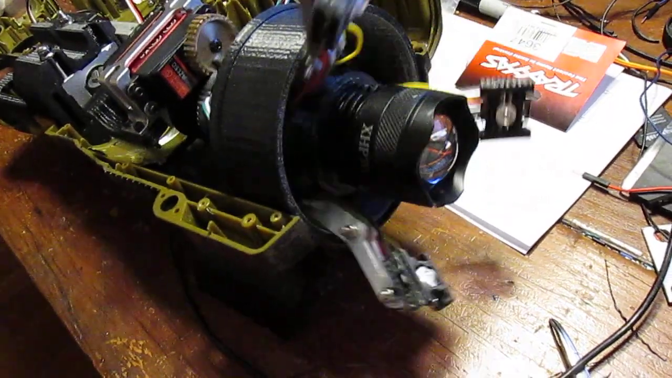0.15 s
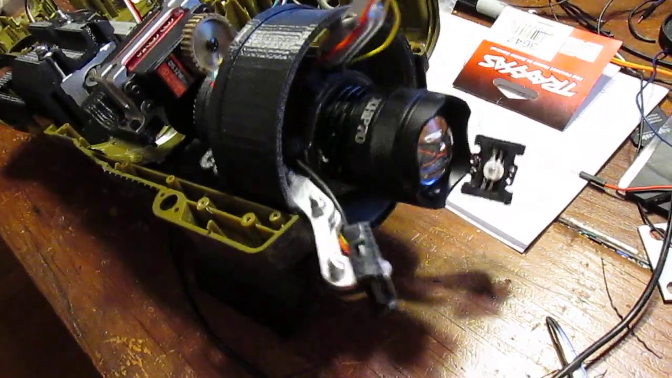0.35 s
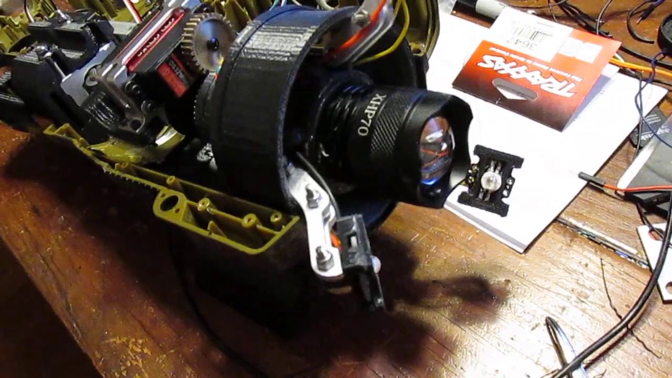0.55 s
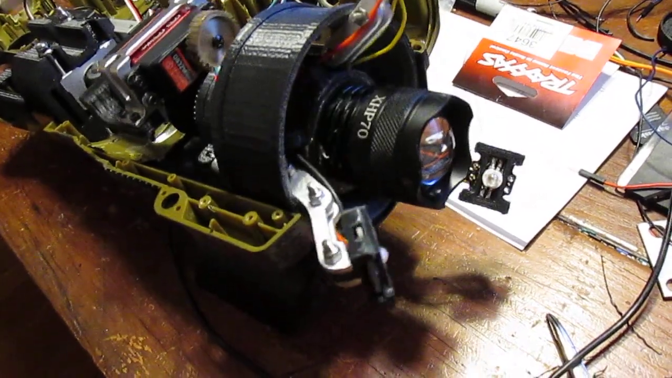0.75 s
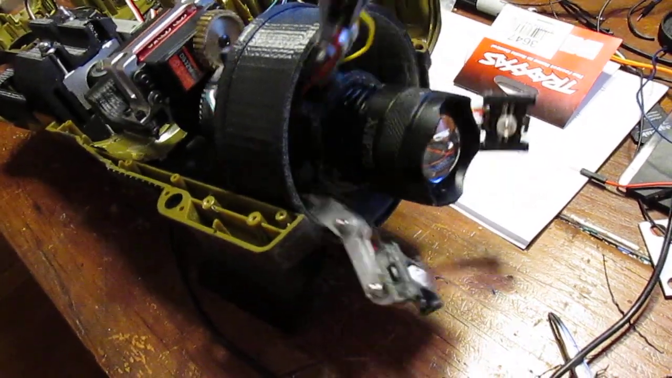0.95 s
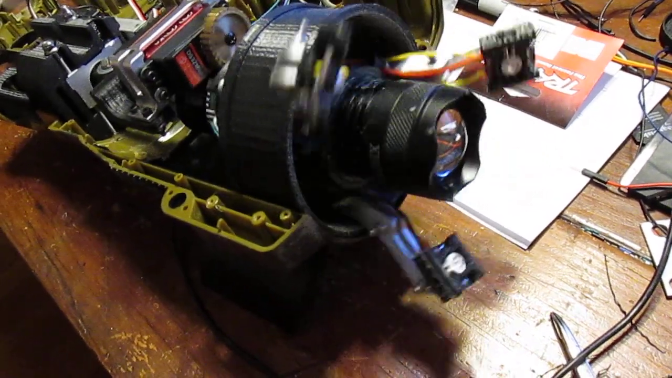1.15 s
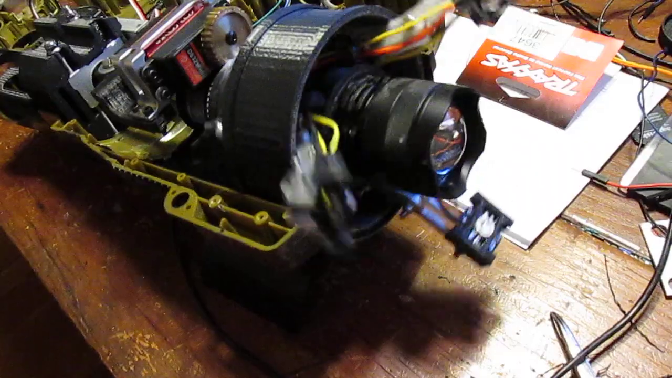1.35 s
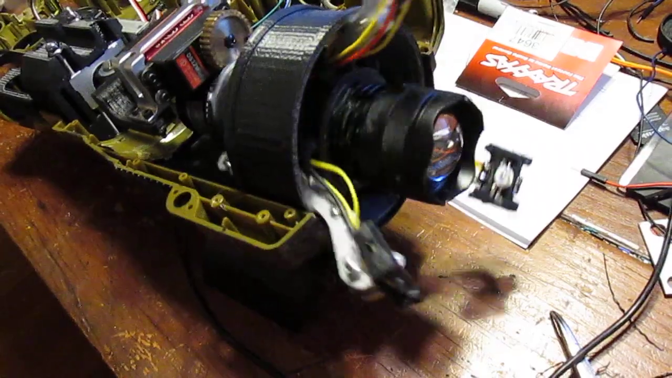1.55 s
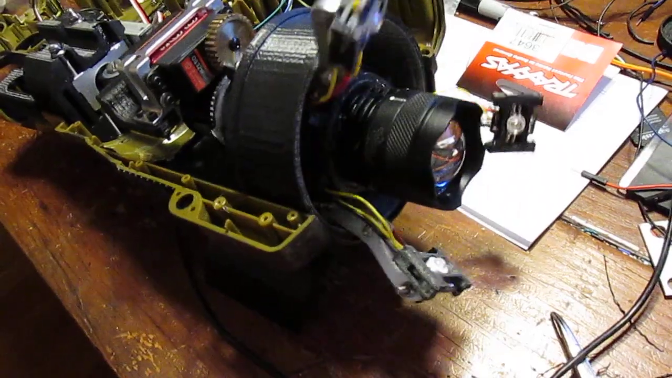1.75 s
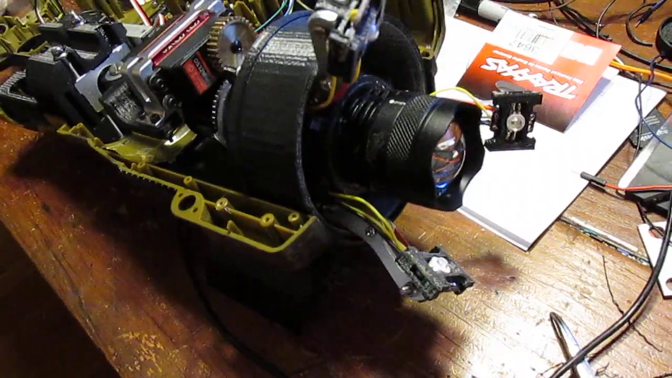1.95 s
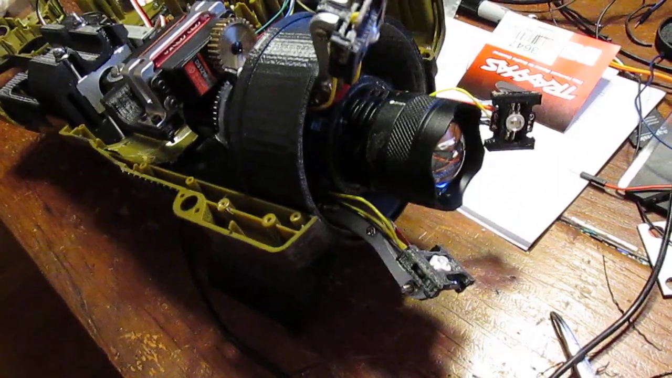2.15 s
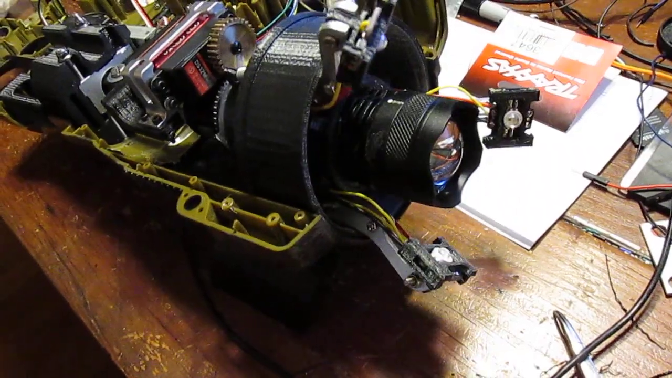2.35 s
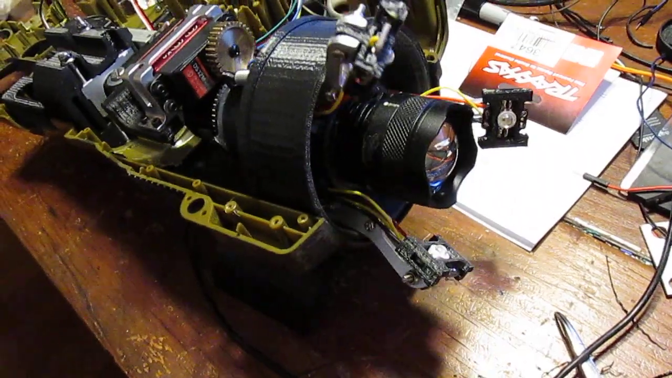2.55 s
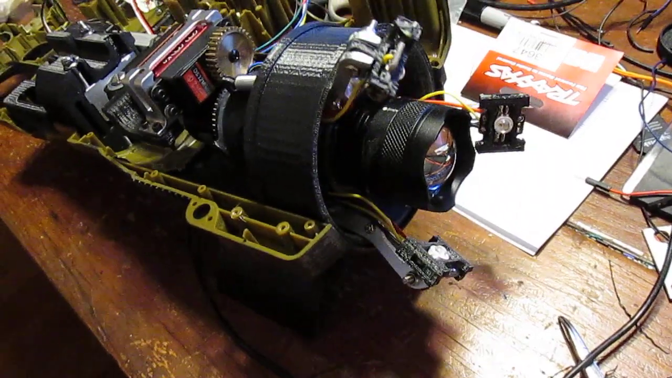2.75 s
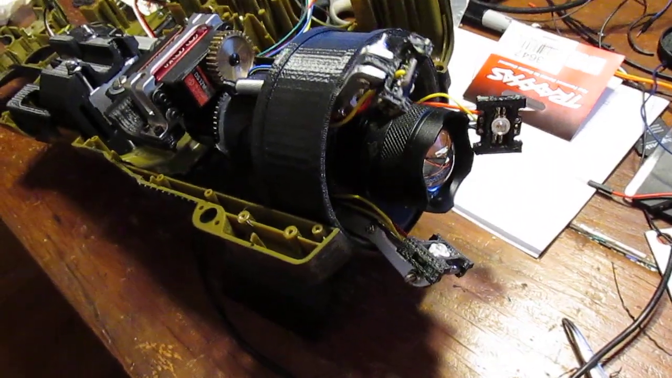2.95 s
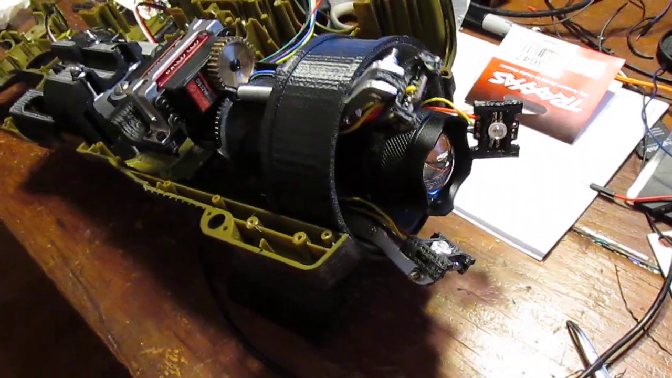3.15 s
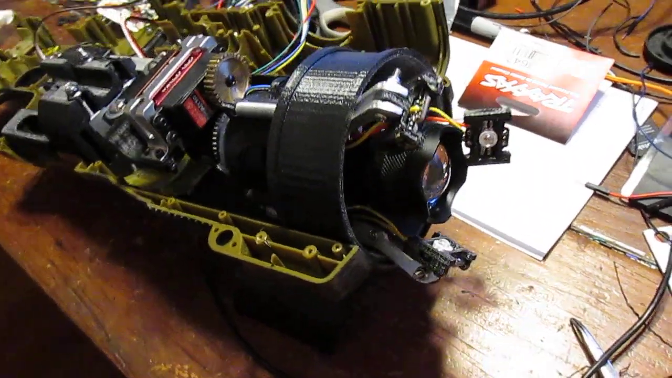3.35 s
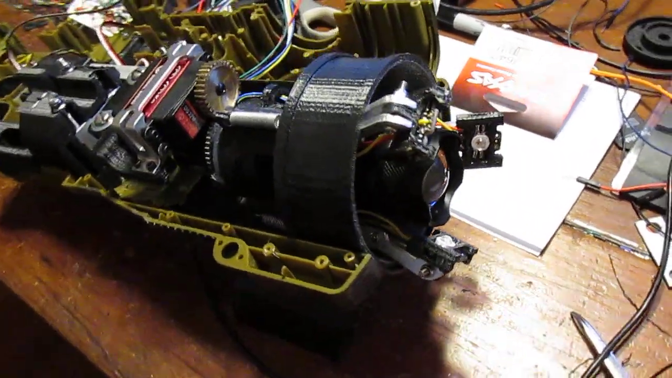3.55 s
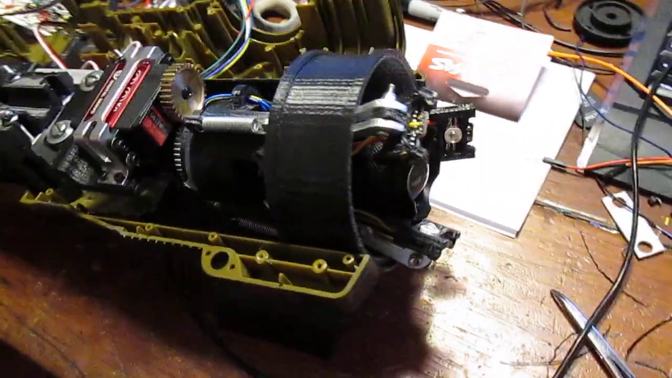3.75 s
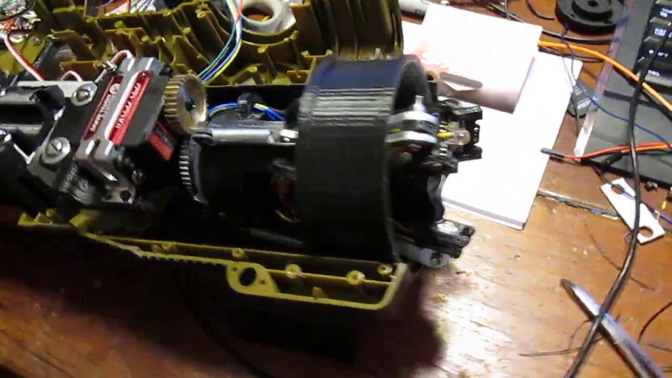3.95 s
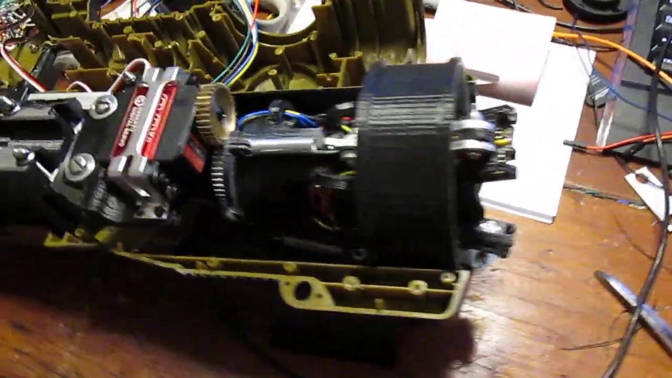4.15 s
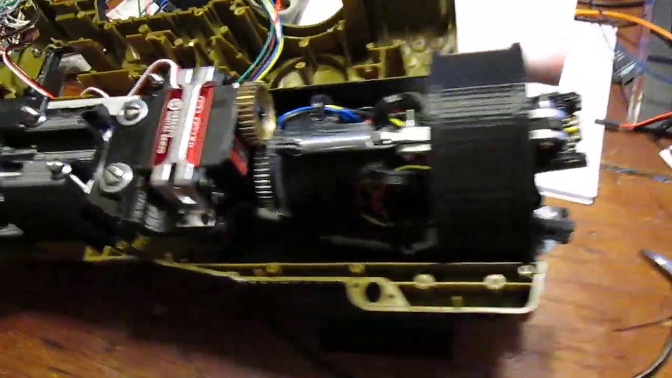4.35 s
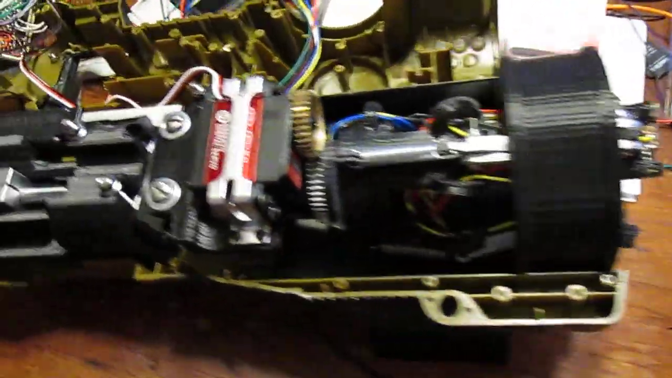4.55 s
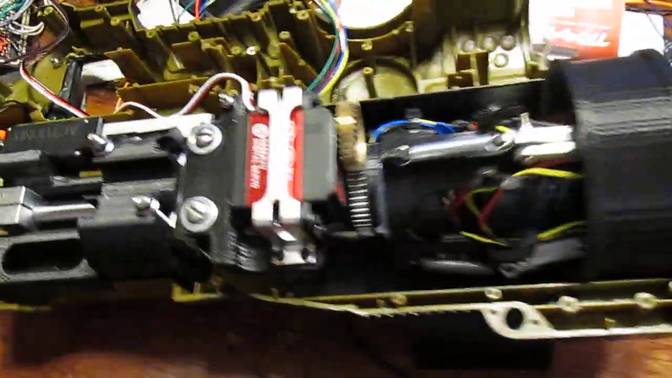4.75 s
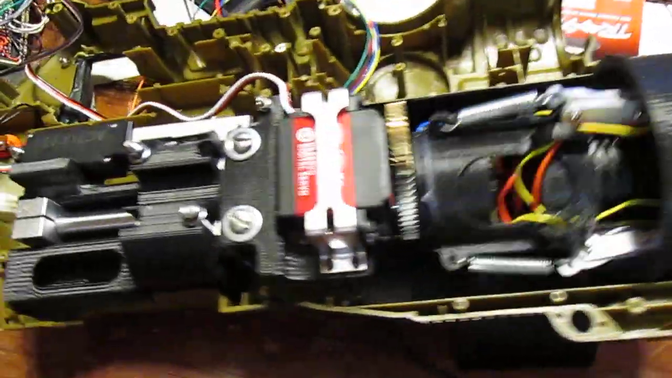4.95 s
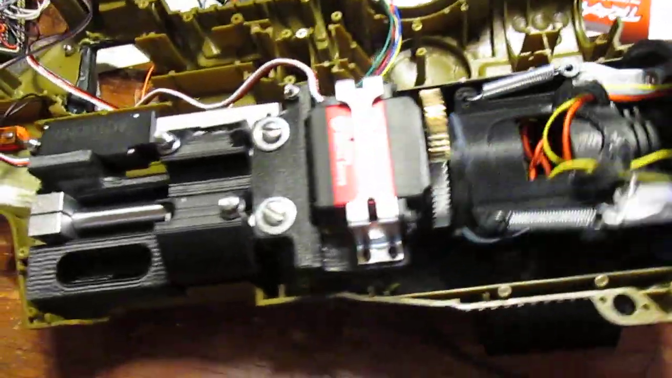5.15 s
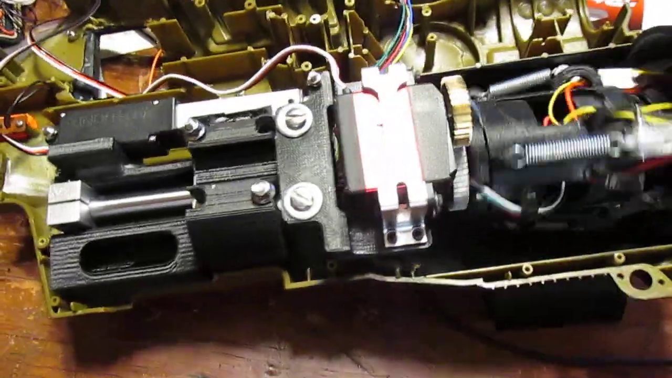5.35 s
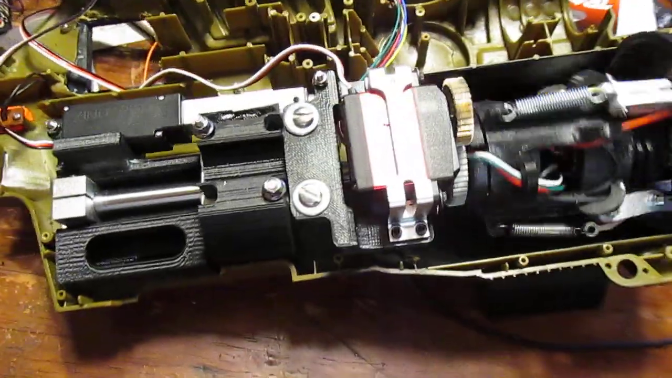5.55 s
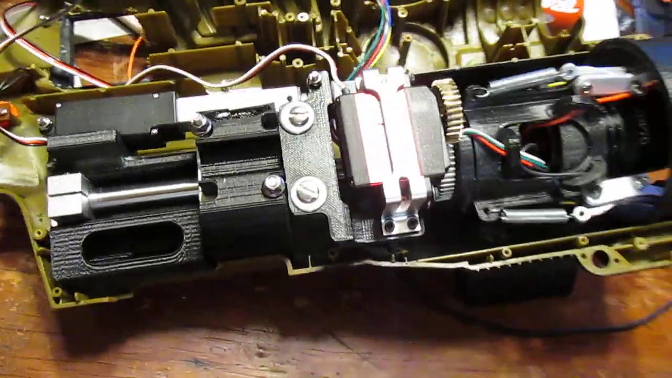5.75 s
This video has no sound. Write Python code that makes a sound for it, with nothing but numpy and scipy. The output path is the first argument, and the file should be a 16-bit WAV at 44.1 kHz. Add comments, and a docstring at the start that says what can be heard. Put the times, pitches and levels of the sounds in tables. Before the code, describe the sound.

Close on a workbench in a small room, a geared servo whirrs already at the start, stops, then swings again with rattling teeth. After a brief quiet, a small actuator motor spins up and hums steadily with gear grind and hiss. A third, brighter servo burst covers it while it slows and fades. Soft plastic knocks and hand rumble on the handheld stereo microphone.

```python
"""On a workbench in a small room, a geared servo swings the arms of a small mechanism three times, close to a
hand-held camera. Its gear teeth whine and rattle; the first swing is already under way at the start.
After the second swing a linear actuator spins up and hums: multiples of its shaft rate, gear grind, brush hiss.
It sags when the servo starts on the same supply, then coasts to a halt. Linkages knock softly, gear teeth snap,
the hand bumps and rumbles on the camera, and a fading noise tail makes the room ring."""
import sys
import numpy as np
from scipy import signal
from scipy.fft import rfft, irfft, next_fast_len
from scipy.io import wavfile

SR = 44100
rng = np.random.default_rng(int(sys.argv[2]) if len(sys.argv) > 2 else 0)


def wav_out(sig):
    """Save sig, one row per channel (or a flat mono array), as 16-bit PCM at SR to the path in sys.argv[1]."""
    wavfile.write(sys.argv[1], SR, np.round(np.clip(np.atleast_2d(sig).T, -1, 1) * 32767).astype(np.int16))


N = 259308
T = np.arange(N) / SR  # time of every sample in seconds

# Servo swings. Each row: start in seconds, start of braking in seconds, rise in seconds, time it stays
# loud into the braking in seconds, base level in dB, level drift in dB per second, whine shift in dB,
# frame level against the case in dB.
SWINGS = [(-0.4, 0.334, .05, 0.067, -24, 2.5, -4, -22), (0.685, 1.711, 0.082, 0.05, -21, -3.5, -4.5, -24),
          (4.655, 5.641, 0.017, 0.054, -18, 0.5, -7.5, -24)]
# Cruising speed of the servo under the changing load of the arms, one table a swing.
# Each row: time in seconds, gear mesh rate in Hz before spin-up, braking and hunting.
CRUISE_1 = [(0.0, 1864), (0.084, 1819), (0.258, 1830), (0.33, 1862)]
CRUISE_2 = [(0.88, 1866), (1.07, 1842), (1.534, 1882), (1.56, 1897)]
CRUISE_3 = [(4.85, 1884), (5.312, 1963), (5.62, 1937)]
# How much the servo gears chatter. Each row: time in seconds, roughness from 0 to about 1.
CHATTER = [(0, 0.07), (.33, 0.18), (.42, 1.03), (.72, 0.57), (.9, 0.13), (1.3, 0.38), (1.5, 0.8),
           (1.8, 0.97), (4.7, 0.78), (5.25, 1), (5.6, 0.73)]
# Whine of each harmonic of the mesh rate, lowest first: dB against the rattle, before the swing's shift.
WHINE_DB = [-12.5, -5.5, -6, -8, -7.5, -14.5, -16]
# Ring of the servo case in each swing. Each row: frequency in Hz, relative level in dB.
CASE_1 = [(1650, -80.5), (2800, -32), (3450, -17), (3580, -14), (3790, -16.5), (4010, -16), (5050, -18.5),
          (5390, -8.5), (6130, -5), (7500, -5), (7830, -5.5), (9100, -1), (10200, -4.5), (13300, -12),
          (15600, -20)]
CASE_2 = [(1650, -42), (2800, -26.5), (3680, -16), (4370, -11), (4630, -23.5), (5090, -13), (5540, -6),
          (6170, -3.5), (7440, -7.5), (8000, -11.5), (8530, -6), (9370, -0.5), (10300, -4.5), (13200, -8.5),
          (15600, -26.5)]
CASE_3 = [(1650, -92.5), (2800, -31.5), (3400, -25), (3790, -17.5), (4010, -26), (4220, -18.5),
          (5830, -9.5), (6590, -17.5), (8850, -5.5), (9640, -2), (10500, -9.5), (11400, -3), (12200, -9.5),
          (13500, -6.5), (15600, -23)]
# Plastic frame shaken by the servo. Each row: frequency in Hz, relative level in dB.
FRAME = [(76, -23.5), (130, -0.5), (211, -24), (247, -1.5), (392, -18.5), (435, -10), (671, -3), (970, 6),
         (1540, 1), (1890, 4), (2190, 0.5), (3000, -11.5), (3900, -16.5), (6600, -120)]
# How a source reaches the two microphone ports, in three parts: rows of frequency in Hz and left-right
# difference in dB; the lead of the left port in seconds; rows of frequency in Hz and likeness from 0 to 1.
SERVO_ASIDE = ([(60, -1.5), (99, 0.5), (160, 5), (270, -6), (450, -1), (740, 0), (1220, 2), (2010, 3.0),
               (3330, 0.5), (5500, 10.5), (9080, 6.5), (15000, 1.5)], .000033, [(150, 1), (900, 1),
               (2200, 0.75), (5500, 1), (9200, 0.93), (15000, 0.48)])
SERVO_AHEAD = ([(60, -1), (99, 11.5), (160, -1), (270, 4), (450, 7), (740, 3), (1220, 7), (2010, 4.5),
               (3330, -3), (5500, 4.5), (9080, 6.5), (15000, 0.5)], -0.000012, [(150, 1), (900, 1),
               (3300, 0.88), (5000, 1), (6800, 0.28), (9500, 1), (15000, 0.5)])
ACTUATOR_AT = ([(60, -3.5), (160, -4), (450, 4), (740, 0.5), (1220, 2), (2010, 0), (3330, -4.5), (5500, 7),
               (9080, 10.5), (15000, -2.5)], .00008, [(150, 0.36), (600, 0.65), (1200, 1), (2600, 1),
               (4000, 0.22), (15000, 0.073)])
# The camera passes over the servo. Each row: time in seconds, added left-right difference in dB.
PASSING = [(4.68, 3.5), (4.736, -1), (5.432, -5.5), (5.72, -5.5)]

# Actuator speed on a full supply, under its changing load. Each row: time in seconds, shaft rate in Hz.
SHAFT_CRUISE = [(2.5, 191.7), (3.19, 192.4), (3.33, 194), (3.59, 189.6), (3.66, 193.1), (3.87, 190),
                (4.01, 192.7), (4.53, 191.4), (4.63, 194.4)]
# Way of the camera along the actuator. Each row: time in seconds, place (0 beside it, 1 above it,
# 2 over its gearbox).
CAMERA = [(3.32, 0.045), (3.43, 0.68), (3.84, 1), (4.0, 1.57), (4.3, 1.92), (4.65, 2.09), (4.85, 1.5)]
# How near the actuator is. Each row: time in seconds, gain in dB.
NEARNESS = [(2.45, -4.5), (3.25, -0.5), (3.8, 1.5), (4.2, 3), (4.6, 6), (4.85, -4.5), (5.15, -1)]
# Strongest shaft orders, as multiples of the shaft rate.
STRONG_ORDERS = (3, 5, 6, 7, 8, 10, 14)
# One row for each strong order: level from beside in dB, from above in dB, over the gearbox in dB,
# swell in dB either way, place of the swell in a screw turn from 0 to 1.
STRONG = [(-55.5, -53.5, -54, .5, 0), (-50.5, -40, -43, 1, 0.48), (-45, -48, -41, 3.5, 0),
          (-38, -46.5, -29, 1.5, 0.78), (-49, -40, -46, 3, 0.19), (-42.5, -48.5, -44, 3.5, 0.02),
          (-40, -46, -37, -1, 0.92)]
# Weaker shaft and gear orders, as multiples of the shaft rate.
WEAK_ORDERS = (4, 9, 11, 11.45, 12, 13, 15, 15.27, 16, 17, 19)
# Level of each weaker order: dB against the buzz, before the housing.
WEAK_DB = [-8, -8, -9, -17, -14.5, -6, -11, -6.5, -15, -5, -2]
# Actuator housing. Each row: frequency in Hz, relative level in dB.
HOUSING = [(350, -26), (620, -16.5), (850, 1), (1050, 1.5), (1300, 4), (1600, -7.5), (2100, -2),
           (2800, -1.5), (3400, -10), (4300, -19), (5500, -30)]
# Colour of the brushes from beside and from above. Each row: frequency in Hz, relative level in dB.
HISS_BESIDE = [(1880, -21.5), (3200, 2.5), (3790, -3), (4250, -15), (4900, -7), (5580, -1.5), (6110, -3),
               (6770, -0.5), (8380, -5), (8660, -9.5), (11000, -5), (11900, -8), (14000, -6), (15000, -39)]
HISS_ABOVE = [(1880, -54.5), (3200, -7.5), (4230, -1), (5130, -2.5), (5230, -2), (5690, -3.5), (7660, -10),
              (8330, -5), (9540, -11), (10900, -1), (11500, -5.5), (13900, -9.5), (15000, -57)]
# Higher shaft orders that whistle, as multiples of the shaft rate.
MESH_ORDERS = (27, 28, 29, 30, 31, 35, 36, 42, 56, 70)
# Whistle of each of these orders from beside and from above: dB within the brush sound, at full speed.
BESIDE_DB = [-22, -12.5, -5.5, -8.5, -24, -6, -9.5, -8, -10, -34]
ABOVE_DB = [-18.5, -12.5, -35, -23, -30, -16, -14.5, -9.5, -1.5, -11.5]

# Linkage knocks. Each row: time in seconds, peak level in dB.
KNOCKS = [(0.404, -40.5), (0.469, -42), (0.535, -46.5), (0.933, -37.5), (1.084, -27), (1.096, -35),
          (1.395, -32.5), (1.784, -46.5), (2.068, -55), (2.104, -45.5), (4.97, -33), (5.463, -32.5),
          (5.685, -35)]
# Ways the plastic frame rings under a knock. Each row: middle frequency in Hz, relative level in dB,
# time to fall by 60 dB in seconds.
FRAME_MODES = [(234, -35, 0.071), (928, 0, 0.17), (992, 5.5, 0.07), (1420, -2.5, 0.16), (1830, -4, 0.026),
               (2440, -3.5, 0.11), (3060, -21.5, 0.035)]
# Gear teeth snapping through their slack. Each row: time in seconds, peak level in dB.
SNAPS = [(0.2894, -18), (0.6905, -31.5), (0.6986, -16.5), (0.7352, -17), (4.6596, -11), (4.7793, -6)]
# Soft bumps of the hand on the camera. Each row: time in seconds, peak level in dB.
BUMPS = [(3.449, -40), (3.529, -41), (3.619, -38), (4.479, -39), (4.511, -37), (4.598, -44)]
# Rumble of the hand-held camera. Each row: time in seconds, level in dB before the trims in background().
HANDLING = [(0, -55.5), (.6, -69.5), (1.05, -58), (1.5, -66.5), (1.85, -71.5), (2.1, -77), (2.9, -72),
            (3.55, -57.5), (4.1, -58), (4.5, -55), (4.95, -68), (5.3, -57), (5.88, -71.5)]
# Colours of the deep sway, the rubbing bass and the room air. Each row: frequency in Hz, relative level in dB.
SUB = [(12, 18), (30, 0.5), (60, -20), (100, -20), (200, -36.5)]
BASS = [(40, 3), (75, 3), (170, 1), (260, -6.5), (400, -13.5), (900, -20), (3000, -51.5), (8000, -93)]
AIR = [(150, -27.5), (250, -18), (466, -18.5), (1610, -11), (2090, -16.5), (3760, -16), (8000, -17),
       (14000, -22), (15500, -16)]
# Ringing of the room. Each row: frequency in Hz, time to fall by 60 dB in seconds.
ROOM = [(200, 0.31), (1200, 0.95), (5000, 0.36), (10000, 0.2), (15000, 0.029)]

SPIN_UP_S, BRAKE_S, BRAKE_CURVE = .046, .15, 1.5  # the servo nears its speed quickly and brakes ever harder
INRUSH_DB, INRUSH_S = 5.5, 0.082  # extra force while it accelerates
JOLT_SHARE = 0.02  # share of the force that is there at once
RELEASE_DB_PER_S = 435  # how fast the gears fall silent
SURGE_DB, SURGE_HZ = 1, 12  # slow, uneven surges of the servo's force at full roughness

ACTUATOR_ON_S, ACTUATOR_OFF_S = 2.067, 5.02
KICK_SHARE, RAMP_S = .45, .41  # it jumps to this share of its speed and ramps up to the rest
SAG_SHARE, DIP_SHARE, DIP_S = 0.064, .125, .042  # sharing the supply slows it, most of all at first
COAST_PER_S, COAST_S = 1.3, 0.56  # share of speed lost each second once off, and how long it is heard
BUZZ_DB, GRIND_DB, BRUSH_DB = -39, -39.5, -39  # weak orders, gear grind, brushes: before speed and nearness
TONE_POWER = 2  # how steeply the shaft tones grow with speed
SCREW_HZ, SCREW_MARK_S = 2.98, 3.33  # strong orders swell once a lead-screw turn, counted from this moment

AIR_DB, MAINS_HZ = -67.5, 120  # still room air; pitch of the mains hum
EDGE_HZ = 15750  # upper limit of the recorder


def servo(row, cruise, case, bearing, runout=0.04, jitter=.024, flutter_db=0.0, mesh_depth=0.23,
          rotor_depth=0.17, grain_db=1.0, hunt_hz=29, hunt_depth=0.01794, hunt_db=1.5):
    """Gear teeth whine and rattle once a mesh; chatter shakes their timing and force; case and frame radiate."""
    *motion, whine_db, frame_db = row
    mesh_hz, force = swing(*motion, cruise)
    rough, = curves(CHATTER)
    # under load the speed hunts up and down, and the force with it
    hunt = rough * np.sin(2 * np.pi * (hunt_hz * T + 0.2616 * wander(7.1)))
    unsteady_hz = mesh_hz * (1 + jitter * rough * wander(330.0) + hunt_depth * hunt)
    turns = np.cumsum(unsteady_hz) / SR  # teeth passed so far

    whine = 0
    for k, db in enumerate(WHINE_DB, 1):
        level = amp(db + whine_db + 2 * wander(29))
        whine = whine + level * np.exp(2j * np.pi * (k * turns + rng.random()))
    # the ten pinion teeth differ a little: side tones, one rotor rate apart
    rotor = turns / 10
    whine = whine * (1 + runout * (unevenness(rotor, count=5) + 1j * unevenness(rotor, count=5)))
    whine = whine * (mesh_hz / mesh_hz.max()) ** 0.67  # slow gears mostly rattle

    contact = 1 + mesh_depth * np.cos(2 * np.pi * turns)
    contact = contact * (1 + rotor_depth * np.cos(2 * np.pi * rotor))
    rattle = evened(rng.standard_normal((2, N)) * contact * amp(grain_db * wander(900)))

    drive = scatter(rattle) + np.sqrt(2) * np.array([whine.real, whine.imag])
    flutter = evened(amp(flutter_db * rough * wander(140) + hunt_db * hunt))
    case_sound = colour(drive, case) * flutter
    frame_sound = amp(frame_db + 2 * wander(20.4)) * colour(drive, FRAME)
    return ports((case_sound + frame_sound) * force, bearing)


def swing(start, brake, rise, hold, level_db, drift_db, cruise):
    """Mesh rate and force of one servo swing: spin up, cruise, brake; the force surges when the gears chatter."""
    since, braking = np.maximum(T - start, 0), np.maximum(T - brake, 0)
    spin_up = 1 - np.exp(-since / SPIN_UP_S)
    slowing = np.maximum(1 - (braking / BRAKE_S) ** BRAKE_CURVE, 0)
    force_db = level_db + drift_db * since + INRUSH_DB * np.exp(-since / INRUSH_S)
    force_db = force_db - RELEASE_DB_PER_S * np.maximum(braking - hold, 0)
    force_db = force_db + SURGE_DB * curves(CHATTER)[0] * wander(SURGE_HZ)
    attack = np.minimum(JOLT_SHARE + since / rise, 1) * (T >= start)
    return curves(cruise)[0] * spin_up * slowing, attack * amp(np.maximum(force_db, -200))


def passing(sound):
    """The servo drifts sideways as the camera moves over it: one port gains what the other loses."""
    pan_db, = curves(PASSING)
    return sound * amp(np.array([pan_db, -pan_db]) / 2)


def actuator(jitter=0.00212, slow_jitter=0.0695, loudness_power=2.73):
    """One shaft, less steady when slow, drives gearbox and brushes; both grow louder with speed and nearness."""
    speed = shaft_speed()
    shaft_hz = speed * curves(SHAFT_CRUISE)[0]
    unsteady = (jitter + slow_jitter * (1 - speed)) * wander(45)
    turns = np.cumsum(shaft_hz * (1 + unsteady)) / SR
    level = speed ** loudness_power * amp(curves(NEARNESS)[0])
    level = level * running(ACTUATOR_ON_S, ACTUATOR_OFF_S + COAST_S, 0.19)
    return ports((gearbox(turns, shaft_hz, speed) + brushes(turns, speed)) * level, ACTUATOR_AT)


def shaft_speed():
    """Share of full speed: the actuator ramps up, sags under the last servo swing and coasts."""
    ramp = 1 - (1 - KICK_SHARE) * (1 - np.clip((T - ACTUATOR_ON_S) / RAMP_S, 0, 1)) ** 2
    shared = np.maximum(T - SWINGS[-1][0], 0) / DIP_S
    supply = 1 - SAG_SHARE * (1 - np.exp(-shared)) - DIP_SHARE * shared * np.exp(1 - shared)
    coast = np.maximum(1 - COAST_PER_S * np.maximum(T - ACTUATOR_OFF_S, 0), 0)
    return ramp * supply * coast


def running(start, stop, fade):
    """One while a motor runs, with a quick start and a fade at the end."""
    return np.clip((T - start) / 0.00067, 0, 1) * np.clip((stop - T) / fade, 0, 1)


def gearbox(turns, shaft_hz, speed, waver_db=4.0, shaft_db=-65, drift_db=2.31):
    """Shaft orders sound through the housing over the grind of the gears; they die away as the shaft slows."""
    place, = curves(CAMERA)
    screw = SCREW_HZ * (T - SCREW_MARK_S)
    lines = 0
    for k, (*heard_db, swell_db, swell_at) in zip(STRONG_ORDERS, STRONG):
        db = np.interp(place, np.arange(len(heard_db)), heard_db)
        db = db + swell_db * np.cos(2 * np.pi * (screw - swell_at))
        # a change of speed moves the order along the response of the housing
        detuned_db = read(HOUSING, k * shaft_hz) - read(HOUSING, k * SHAFT_CRUISE[0][1])
        lines = lines + order(turns, k, db + detuned_db + drift_db * wander(22.4))
    for k, db in zip(WEAK_ORDERS, WEAK_DB):
        housed_db = BUZZ_DB + db + read(HOUSING, k * shaft_hz)
        lines = lines + order(turns, k, housed_db + waver_db * wander(10.4))
    lines = lines * speed ** TONE_POWER + order(turns, 0.99, shaft_db)
    grind = colour(scatter(rng.standard_normal((2, N)) * scrape(turns, depth=0.79)), HOUSING)
    return np.array([lines.real, lines.imag]) + grind * amp(GRIND_DB)


def brushes(turns, speed, beside_hiss_db=-5, beside_buzz_db=-3, above_hiss_db=-3.5, above_buzz_db=-7):
    """Brushes hiss and buzz over the same uneven commutator each turn; the pinion adds a rough whistle."""
    above = np.clip(np.interp(curves(CAMERA)[0], [0, 1], [.12, .86]), 0, 1)
    hiss = rng.standard_normal((2, N)) * scrape(turns, depth=0.17)
    buzz = np.array([unevenness(turns, count=75), unevenness(turns, count=75)])
    from_beside = amp(beside_hiss_db) * colour(hiss, HISS_BESIDE) + amp(beside_buzz_db) * colour(buzz, HISS_BESIDE)
    from_above = amp(above_hiss_db) * colour(hiss, HISS_ABOVE) + amp(above_buzz_db) * colour(buzz, HISS_ABOVE)
    sound = np.sqrt(1 - above) * from_beside + np.sqrt(above) * from_above

    loose = turns + .0015 * wander(130)  # the pinion rocks a little in its slack
    whistle = 0
    for k, side, top in zip(MESH_ORDERS, BESIDE_DB, ABOVE_DB):
        whistle = whistle + order(loose, k, side + above * (top - side) + wander(11))
    whistle = whistle * speed ** 4  # it only sings near full speed
    return (sound + np.array([whistle.real, whistle.imag])) * amp(BRUSH_DB + 0.79 * wander(30.0))


def order(turns, k, db):
    """One multiple of a shaft's rate, as a complex tone."""
    return np.sqrt(2) * amp(db) * np.exp(2j * np.pi * (k * turns + rng.random()))


def scrape(turns, depth):
    """Contact force peaks once, twice and three times a turn of the three-pole rotor."""
    peaks = sum(np.cos(2 * np.pi * k * turns) / np.sqrt(k) for k in range(1, 4))
    return evened(1 + depth * peaks)


def unevenness(turns, count):
    """A random profile that repeats on every turn of a shaft, with count equal harmonics."""
    around = np.linspace(0, 1, 4097)
    profile = sum(np.cos(2 * np.pi * (k * around + rng.random())) for k in range(1, count + 1))
    return np.interp(turns % 1, around, evened(profile))


def scatter(pair, echo_db=-17, count=6):
    """Nearby parts and the bench top return the sound within 7 ms and ripple its spectrum."""
    out = pair.copy()
    for side in (0, 1):
        for delay in rng.integers(40, 300, count):  # in samples
            out[side, delay:] += amp(echo_db) * rng.choice([-1, 1]) * pair[side, :-delay]
    return out


def knock():
    """The plastic frame rings briefly: fading sines, each a little off its middle pitch."""
    t = T[:6000]
    ring = 0
    for hz, db, t60 in FRAME_MODES:
        tone = np.sin(2 * np.pi * (hz * rng.uniform(0.92, 1.04) * t + rng.random()))
        ring = ring + amp(db - 60 * t / t60) * tone
    return np.array([ring, ring])


def snap(t60=0.0044):
    """A bright crack of metal teeth: a very short burst of high noise."""
    t = T[:2000]
    band = signal.butter(2, [5000, 12000], "bandpass", fs=SR, output="sos")
    return signal.sosfilt(band, rng.standard_normal((2, len(t))) * amp(-60 * t / t60))


def bump(t60=0.03):
    """A dull thud through the camera body: a short burst of low noise, the same in both ports."""
    t = T[:6000]
    band = signal.butter(2, [70, 240], "bandpass", fs=SR, output="sos")
    thud = signal.sosfilt(band, rng.standard_normal(len(t)) * amp(-60 * t / t60))
    return np.array([thud, thud])


def blows(events, ring):
    """Each event sets off a fresh ring at its peak level."""
    out = np.zeros((2, N))
    for s, db in events:
        sound = ring()
        sound = amp(db) * sound / abs(sound).max()
        part = out[:, round(s * SR):]
        part[:, :sound.shape[1]] += sound[:, :part.shape[1]]
    return out


def background(sub_db=-4, bass_db=-54, bass_follow=0.67, lumps_db=2.5, hum_db=-63, apart=0.5):
    """Lumpy hand rumble on the camera, still room air and mains hum."""
    def noise(spectrum):
        """Coloured noise, partly shared by both ports."""
        mid, side = colour(rng.standard_normal((2, N)), spectrum)
        return np.array([mid + apart * side, mid - apart * side])

    hand_db, = curves(HANDLING)
    sway = noise(SUB) * amp(hand_db + sub_db + lumps_db * wander(5))
    rub_db = bass_db + bass_follow * (hand_db - hand_db.mean())
    rub = noise(BASS) * amp(rub_db + lumps_db * wander(6.5))
    hum = np.sqrt(2) * amp(hum_db) * np.sin(2 * np.pi * MAINS_HZ * T)
    return sway + rub + noise(AIR) * amp(AIR_DB) + hum


def room(x):
    """A diffuse tail of fading noise in which the treble dies first."""
    late_noise = rng.standard_normal((2, SR)) * (T[:SR] > .006)
    hz, t, z = signal.stft(late_noise, SR, nperseg=256)
    fade = amp(-60 * t / read(ROOM, hz)[:, None])
    tail = signal.istft(z * fade, SR, nperseg=256)[1]
    return signal.fftconvolve(x, tail / np.linalg.norm(tail[0]), axes=1)[:, :N]


def ports(pair, bearing):
    """Two microphone ports hear a shared sound and a scattered part, apart in level and time."""
    size = next_fast_len(N + 4096)
    f = np.fft.rfftfreq(size, 1 / SR)
    balance, lead_s, likeness = bearing
    same = np.clip(read(likeness, f), 0, 1)
    tilt = amp(read(balance, f) / 2)
    lead = 2 * np.pi * f * lead_s
    shared, scattered = rfft(pair, size)
    shared, scattered = shared * np.sqrt((1 + same) / 2), scattered * np.sqrt((1 - same) / 2)
    turn = tilt * np.exp(.5j * lead)
    # the sum of both ports keeps the source's level, within a limit
    centre = np.sqrt(np.maximum(tilt ** 2 + tilt ** -2 + 2 * same * np.cos(lead), 1)) / 2
    left, right = (shared + scattered) * turn, (shared - scattered) / turn
    return irfft(np.array([left, right]) / centre, size)[:, :N]


def amp(db):
    """Decibels to gain."""
    return 10 ** (np.asarray(db) / 20)


def evened(x):
    """Scales to an average (rms) level of one."""
    return x / np.sqrt(np.mean(x ** 2) + 1e-20)


def read(points, hz):
    """Reads a table by frequency, with straight lines on a log-frequency axis."""
    f, value = np.transpose(points)
    return np.interp(np.log(hz + 1), np.log(f + 1), value)


def curves(rows):
    """Each column of a table after the time, sample by sample."""
    s, *columns = np.transpose(rows)
    return [np.interp(T, s, c) for c in columns]


def filtered(x, response):
    """Applies a response given as a function of frequency."""
    size = next_fast_len(N + 4096)
    return irfft(rfft(x, size) * response(np.fft.rfftfreq(size, 1 / SR)), size)[..., :N]


def colour(x, spectrum):
    """Shapes a sound by a spectrum, at an rms level of one."""
    return evened(filtered(x, lambda f: amp(read(spectrum, f))))


def wander(rate_hz):
    """Smooth random change, up to about the given rate, at an rms level of one."""
    return evened(filtered(rng.standard_normal(N), lambda f: 1 / (1 + (f / rate_hz) ** 4)))


def scene():
    """Both motors, knocks and snaps in the room, with the background and the hand's bumps on top."""
    swings = servo(SWINGS[0], CRUISE_1, CASE_1, SERVO_ASIDE)
    swings += servo(SWINGS[1], CRUISE_2, CASE_2, SERVO_ASIDE)
    swings += passing(servo(SWINGS[2], CRUISE_3, CASE_3, SERVO_AHEAD))
    swings += blows(KNOCKS, knock) + blows(SNAPS, snap)
    hum = actuator()
    ringing = room(amp(-17.5) * swings + amp(-17) * hum)
    return swings + hum + ringing + background() + blows(BUMPS, bump)


def record(dry):
    """The recorder's band limit: a steep filter takes away the highest treble."""
    low_pass = signal.firwin(511, EDGE_HZ, window=("kaiser", 9), fs=SR)
    return signal.oaconvolve(dry, low_pass[None], "same")


dry = scene()
out = record(dry)
wav_out(out)
```